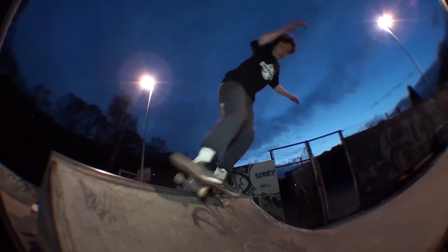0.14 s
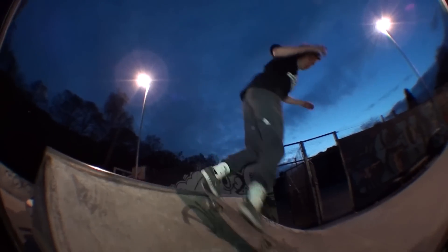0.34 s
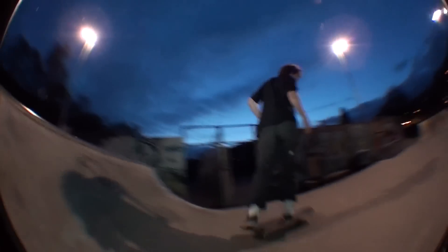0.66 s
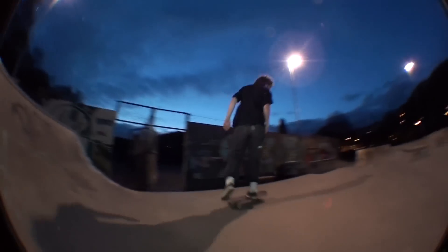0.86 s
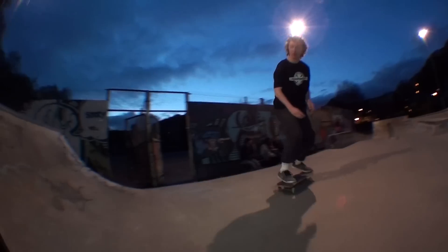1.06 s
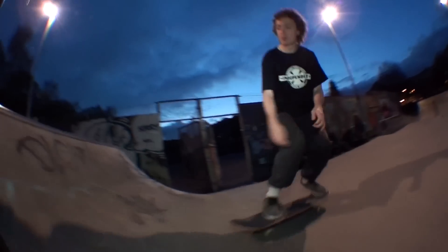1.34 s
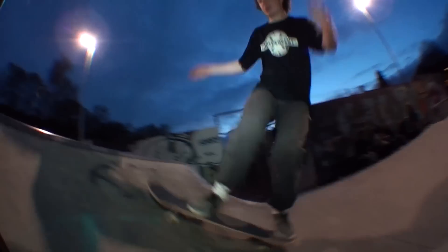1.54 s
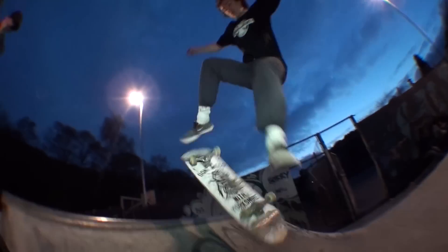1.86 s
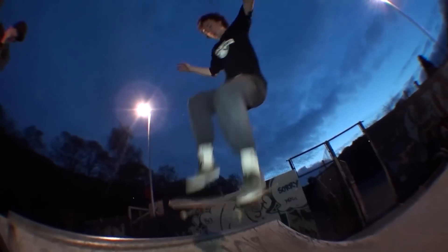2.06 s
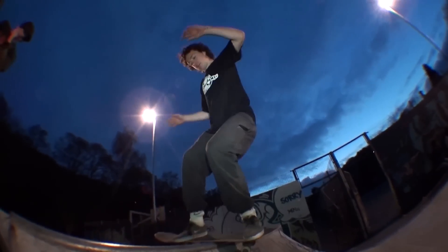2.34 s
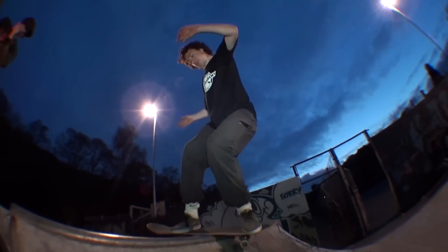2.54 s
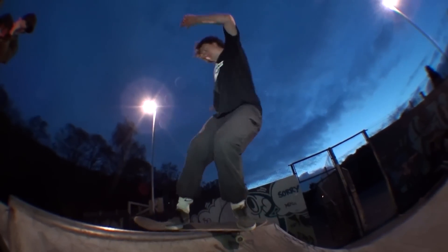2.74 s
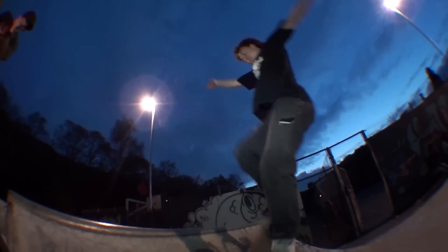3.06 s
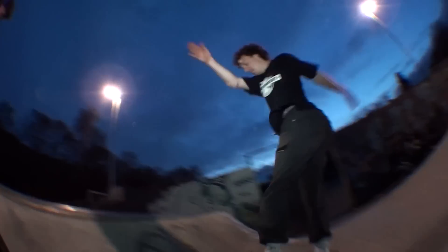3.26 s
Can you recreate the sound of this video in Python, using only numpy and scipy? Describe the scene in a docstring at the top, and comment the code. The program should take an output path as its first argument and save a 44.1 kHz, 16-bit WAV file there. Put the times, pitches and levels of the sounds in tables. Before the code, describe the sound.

Close skateboard on rough outdoor concrete: brief wheel squeals, sharp landing knocks, a steady grinding roll, a pop and rattling flip, dense clatter, a quiet stall, then scraping knocks and rolling; left-leaning, peaks squashed.

```python
"""A concrete skatepark, close to the ramp lip: a board drops off it with a wheel squeal, rolls across,
is flipped, clatters down onto the lip, stalls, then knocks and scrapes back in. Rolling and contacts are
noise through deck and truck resonances, squeals are stick-slip harmonics, tones are gliding noise bands.
Wind and far hiss lie behind. The near camera microphone is louder on its left; a look-ahead limiter
holds the peaks."""
import sys
import numpy as np
from scipy import signal
from scipy.fft import rfft, irfft, next_fast_len
from scipy.io import wavfile
from scipy.ndimage import uniform_filter1d, minimum_filter1d, map_coordinates

SR = 44100
rng = np.random.default_rng(int(sys.argv[2]) if len(sys.argv) > 2 else 0)


def store_wav(level_fs):
    """Save 16-bit WAV to argv[1]."""
    pcm = np.round(np.clip(np.atleast_2d(level_fs), -1, 1) * 32767)
    wavfile.write(sys.argv[1], SR, pcm.T.astype(np.int16))


def voltage_ratio(decibels):
    """Convert decibels (scalar or array-like) to amplitude ratios, 20 dB per decade."""
    exponent = np.asarray(decibels, float) / 20
    return 10 ** exponent


N = 149940  # samples

# axle and wheel resonances: centre_hz, width_hz, peak_db
TRUCK_MODES = [(1016, 23, 5), (1710, 26, 0.5), (2810, 180, 2.5), (3940, 150, 1.5), (6720, 340, 3)]
# plywood resonances: centre_hz, width_hz, peak_db
DECK_MODES = [(183, 110, 0), (517, 62, 3.5)]
RISE_S, STRIKE_DECAY_S = 0.00051, 0.0011  # onset and time constant of hard contacts
DECK_KNOTS_PER_S = 70  # waver of the deck's tones


def unit(x):
    """Scale to rms 1."""
    return x / np.sqrt(np.mean(x ** 2) + 1e-20)


def along(points, hz):
    """Interpolate (Hz, value) points on a log frequency axis."""
    f, v = np.transpose(points)
    return np.interp(np.log(hz + 1), np.log(f + 1), v)


def curves(rows):
    """One value per sample for each column after the time."""
    s, *cols = np.transpose(rows)
    return [np.interp(np.arange(N) / SR, s, c) for c in cols]


def wobble(rate):
    """A smooth random curve, rate knots a second."""
    knots = rng.standard_normal(int(N * rate / SR) + 4)
    return map_coordinates(knots, [np.arange(N) * rate / SR])


def filtered(x, response):
    """Shape the spectrum of x by a response of frequency."""
    n = x.shape[-1]
    m = next_fast_len(n + 4096)
    return irfft(rfft(x, m) * response(np.fft.rfftfreq(m, 1 / SR)), m)[..., :n]


def body(spectrum, modes):
    """A broad colour with resonant peaks on it."""
    def response(hz):
        peaks_db = sum(db / (1 + (2 * (hz - c) / w) ** 2) for c, w, db in modes)
        return voltage_ratio(along(spectrum, hz) + peaks_db)
    return response


def narrow(rows, knots_per_s, steady=0):
    """A gliding, wavering band of noise, silent outside its rows; more knots widen it."""
    hz, db = curves(rows)
    t = np.arange(N) / SR
    phase = 2 * np.pi * np.cumsum(hz) / SR
    in_phase = (steady + wobble(knots_per_s)) * np.sin(phase)
    band = unit(in_phase + wobble(knots_per_s) * np.cos(phase))
    return voltage_ratio(db) * band * (t > rows[0][0]) * (t < rows[-1][0])


def gritty(patchy_db):
    """Stones of scattered size tick under a patchy rubbing noise."""
    grit_per_s, grit_spread_db, grit_share = 1500, 5, 0.23  # share of the power
    z = signal.stft(rng.standard_normal(N), nperseg=512)[2]
    field = uniform_filter1d(rng.standard_normal(z.shape), size=2, axis=0)
    field = uniform_filter1d(field, size=6, axis=1)
    s = np.arange(z.shape[1]) * 256 / SR
    # free wheels rattle in deeper patches during the flip
    depth_db = patchy_db + 1.3 * (s > 1.72) * (s < 2.15)
    rub = signal.istft(z * voltage_ratio(depth_db * unit(field)), nperseg=512)[1][:N]
    hits = rng.random(N) < grit_per_s / SR
    ticks = hits * voltage_ratio(grit_spread_db * rng.random(N)) * rng.standard_normal(N)
    return np.sqrt(1 - grit_share) * unit(rub) + np.sqrt(grit_share) * unit(ticks)


def roll():
    """Rough concrete shakes deck, wheels and bearings; bumps are felt by all."""
    # board on concrete, before bumps: start_s, rumble_db, rasp_db, bearing_db, hiss_db
    rolling = [(0, -52, -41, -46, -53), (.17, -49.5, -41, -41.5, -44), (.27, -50, -35.5, -44, -43.5),
               (.4, -40.5, -36.5, -35.5, -38), (.6, -33, -35, -35, -35), (.72, -32, -35.5, -37, -37),
               (.93, -34.5, -42, -38.5, -38.5), (1.055, -38, -44, -40, -40), (1.07, -41, -32.5, -39, -37.5),
               (1.13, -44.5, -35.5, -38, -38), (1.17, -35, -34.5, -34.5, -38),
               (1.68, -34.5, -35.5, -32.5, -33), (1.71, -47.5, -40, -34, -38),
               (1.8, -43.5, -34, -33, -32.5), (2.02, -49, -36.5, -35, -44.5),
               (2.13, -49.5, -35, -32, -50.5), (2.16, -45, -49, -39, -45), (2.38, -55, -49, -52, -54),
               (2.8, -58.5, -59, -64, -59), (3.1, -46, -38.5, -41.5, -49),
               (3.25, -56.5, -37.5, -37.5, -41.5), (3.3, -42, -49, -31.5, -44.5),
               (3.4, -37, -36, -37.5, -38)]
    # deck rumble colour: hz, level_db_per_hz
    rumble_colour = [(59, -51), (100, -16), (160, -3.5), (400, 1.5), (759, -1.5), (1100, -16), (1430, -32),
                     (2420, -120)]
    # wheel rasp colour: hz, level_db_per_hz
    rasp_colour = [(470, -46), (820, -6), (1610, 1), (2400, -6), (3120, -34), (5280, -120)]
    # bearing rasp colour: hz, level_db_per_hz
    bearing_colour = [(1290, -60), (2200, -0.5), (3880, 3), (4800, -16), (6240, -45), (10600, -120)]
    # grit hiss colour: hz, level_db_per_hz
    hiss_colour = [(2530, -41), (4300, -4), (7620, -8.5), (8430, -13.5), (9470, -26.5), (11400, -24.5),
                   (16200, -42.5)]
    rumble_db, rasp_db, bearing_db, hiss_db = curves(rolling)
    bumps_db = 0.73 * wobble(30.31) + 1.1 * wobble(120)
    # the wheels hop briefly off the concrete
    hop_s, hop_length_s, hop_db = .494, .017, -9
    hopping = abs(np.arange(N) / SR - hop_s - hop_length_s / 2) < hop_length_s / 2
    bumps_db = bumps_db + hop_db * hopping

    def layer(db, colour, modes):
        return voltage_ratio(db + bumps_db) * unit(filtered(gritty(2.8), body(colour, modes)))

    return (layer(rumble_db, rumble_colour, DECK_MODES)
            + layer(rasp_db, rasp_colour, TRUCK_MODES)
            + layer(bearing_db, bearing_colour, TRUCK_MODES)
            + layer(hiss_db, hiss_colour, TRUCK_MODES))


def wind():
    """Wind on the microphone: low noise that slowly swells and sinks."""
    # wind before its swells: start_s, level_db
    wind_levels = [(0, -54), (1.05, -55.5), (1.1, -66), (3.4, -66.5)]
    # wind colour: hz, level_db_per_hz
    gust_colour = [(12, -49), (38, -11), (91, -8), (115, -1), (150, -18), (250, -120)]
    wind_db, = curves(wind_levels)
    noise = unit(filtered(rng.standard_normal(N), body(gust_colour, [])))
    return voltage_ratio(wind_db + 1.6 * wobble(7.8)) * noise


def park_hiss():
    """Steady coloured noise of the far town and park."""
    # far hiss colour: hz, level_db_per_hz
    park_colour = [(150, -17), (550, 2), (1050, -4.5), (1500, 0), (2500, 0.5), (3150, -10.5), (3800, -2.5),
                   (5200, -24.5), (7000, -16), (10000, -27.5), (16000, -38)]
    return voltage_ratio(-47) * unit(filtered(rng.standard_normal(N), body(park_colour, [])))


def contact_body():
    """Response of deck and trucks to a contact."""
    # contact colour: hz, level_db_per_hz
    contact_colour = [(88, -40), (300, -6), (842, -4.5), (1670, 1.5), (2110, -2), (4120, -1), (5420, -6),
                      (6460, -1), (8300, -6.5), (9500, -18.5), (16200, -38)]
    return body(contact_colour, DECK_MODES + TRUCK_MODES)


def contact_rise(t):
    """Fast smooth onset of a contact."""
    return 1 - np.exp(-(t / RISE_S) ** 2)


def without_lows(x):
    """Take out a contact's lows, below 230 Hz."""
    return signal.sosfilt(signal.butter(4, 230, 'high', fs=SR, output='sos'), x)


def knocks():
    """Tail, trucks and wheels: a crack, rough noise while contact holds, then a decay through the board."""
    # knocks and scrapes: start_s, level_db, hold_s, t60_s, brightness_db_per_octave
    contacts = [(.0016, -30, 0.00081, .008, 3), (.0072, -32.5, 0.00087, .015, -2),
                (0.028, -34, 0.0011, 0.019, 0), (.0493, -30, 0.011, 0.027, 1),
                (0.112, -35.5, 0.0069, 0.03, 0.5), (0.4045, -31, 0.002, 0.02, 3),
                (0.4632, -19, 0.0058, 0.05, 0), (2.158, -25, 0.008, 0.19, -1), (2.1865, -26, .008, .03, 1),
                (2.199, -28, 0.013, 0.024, 1.5), (2.229, -23, 0.008, 0.02, 0),
                (2.25, -25, 0.0095, 0.012, 2), (2.2715, -25, 0.0033, .05, 2),
                (2.29, -29.5, 0.00067, 0.044, -3), (2.306, -31.5, 0.004, 0.055, -1),
                (2.323, -40, 0.009, 0.087, -3), (2.36, -43.5, 0.0022, 0.018, 12),
                (2.8252, -24.5, 0.0059, 0.1, -1), (2.928, -33, 0.0072, 0.012, 5.5),
                (2.9702, -27.5, 0.0066, 0.22, -1), (2.999, -34, 0.0035, 0.23, -1),
                (3.112, -24, 0.044, 0.037, -2), (3.142, -28.5, 0.088, 0.033, 1),
                (3.219, -30, 0.0089, 0.036, -1), (3.2653, -25, 0.0075, 0.036, -0.5),
                (3.286, -27, 0.01, 0.035, -0.5), (3.307, -25, 0.013, 0.033, 0.5),
                (3.321, -23, 0.0052, 0.019, -2.5), ]
    crack = 1.25  # extra size of the first crack
    out, t = np.zeros(N + SR), np.arange(SR // 2) / SR
    board, rub = contact_body(), gritty(2.5)
    for s, db, hold, t60, tilt_db in contacts:
        def tilted(hz):
            return board(hz) * voltage_ratio(tilt_db * np.log2(hz / 2500 + 0.0092))
        piece = np.roll(rub, rng.integers(N))[:len(t)]
        noise = unit(filtered(piece, tilted))
        # roughness: a new random level every 90 samples
        rough = voltage_ratio(4.2 * np.repeat(rng.standard_normal(len(t) // 90 + 1), 90)[:len(t)])
        decay = voltage_ratio(-60 * np.maximum(t - hold, 0) / t60)
        first_crack = 1 + crack * np.exp(-t / STRIKE_DECAY_S)
        shape = decay * rough * contact_rise(t) * first_crack
        out[round(s * SR):][:len(t)] += voltage_ratio(db) * shape * noise
    return without_lows(out[:N])


def squeals():
    """Urethane squeals on the lip: stick-slip harmonics at a gliding, jittering rate, coloured by the wheel."""
    # squeals: start_s, length_s, start_slip_hz, end_slip_hz, level_db (before flutter)
    slips = [(0.052, 0.019, 2390, 2320, -29.5), (.068, 0.0088, 2570, 2770, -33),
             (0.178, 0.0066, 3200, 3590, -26), (0.183, 0.014, 5000, 7300, -29),
             (0.201, 0.0092, 7200, 6400, -29), (0.21, 0.016, 6000, 5150, -31.5),
             (.218, 0.016, 5000, 4440, -34), (0.233, 0.014, 1700, 1555, -27.5),
             (0.2483, 0.014, 1367, 1355, -30), (0.297, 0.0135, 1390, 1340, -35)]
    # wheel colour: hz, level_db
    wheel_colour = [(1400, -19), (2400, 6), (4300, -7), (5500, 4), (6900, 10.5), (8200, -2.5), (10000, -22),
                    (14000, -28), (17000, -60)]
    out = np.zeros(N)
    jitter = 1 + .01 * wobble(600)
    flutter = voltage_ratio(3 * wobble(343))
    k = np.arange(1, 11)[:, None]  # harmonic numbers
    for s, length, start_hz, end_hz, db in slips:
        i, n = round(s * SR), round(length * SR)
        hz = np.linspace(start_hz, end_hz, n) * jitter[i:i + n]
        phase = 2 * np.pi * np.cumsum(hz) / SR
        stack = (voltage_ratio(along(wheel_colour, k * hz)) * np.sin(k * phase + k ** 2)).sum(axis=0)
        out[i:i + n] += voltage_ratio(db) * unit(stack) * signal.windows.tukey(n, .3) * flutter[i:i + n]
    return out


def strikes():
    """Hard strikes: very short noise bursts through the board, far over the limiter's ceiling."""
    # hard strikes: start_s
    strike_times = [0.288, .443, 0.4645, 0.4922, 0.5124, 0.5456, 1.796, 2.1575, 2.218, 2.2413, 3.113,
                    3.2667]
    out, t = np.zeros(N + SR), np.arange(SR // 2) / SR
    board = contact_body()
    shape = contact_rise(t) * np.exp(-t / STRIKE_DECAY_S)
    for s in strike_times:
        noise = unit(filtered(rng.standard_normal(len(t)), board))
        out[round(s * SR):][:len(t)] += voltage_ratio(-4) * shape * noise
    return without_lows(out[:N])


def deck_flex():
    """The top deck mode glides as the deck bends with load."""
    # top deck mode: start_s, pitch_hz, level_db
    flex_glide = [(.43, 751.5, -41.5), (.7, 694.5, -39), (1.08, 700, -50), (1.58, 769, -36),
                  (1.75, 752, -44)]
    return narrow(flex_glide, DECK_KNOTS_PER_S)


def bearing_whine():
    """Loaded bearings whine in the turn, a wide wavering band."""
    # bearing whine: start_s, pitch_hz, level_db
    whine_glide = [(.62, 3640, -50), (.72, 3690, -36), (.9, 3390, -33), (.93, 3380, -55)]
    return narrow(whine_glide, 740)


def wheel_hum():
    """Wheels drum at a falling pitch, with a partly steady tone."""
    # wheel drumming: start_s, pitch_hz, level_db
    hum_glide = [(1.1, 198.7, -74), (1.16, 170, -47), (1.43, 140.3, -46)]
    return narrow(hum_glide, 25, steady=0.78)


def foot_thump():
    """A foot settles on the deck: one soft low decaying tone."""
    start_s, pitch_hz, level_db, t60_s = 2.515, 108.6, -42.5, 0.19
    t = np.maximum(np.arange(N) / SR - start_s, 0)
    rise = 1 - np.exp(-t / 0.0064)
    return voltage_ratio(level_db - 60 * t / t60_s) * np.sin(2 * np.pi * pitch_hz * t) * rise


def axle_ring():
    """The axle sings on the lip, a wavering band."""
    # axle singing: start_s, pitch_hz, level_db
    ring_glide = [(3.118, 900, -32.5), (3.155, 1750, -29), (3.195, 1620, -30.5), (3.232, 1750, -28)]
    return narrow(ring_glide, 320)


def lip_slide():
    """The deck's lowest mode and an upper partial rise as it slides over the lip."""
    # lowest deck mode: start_s, pitch_hz, level_db
    slide_glide = [(3.125, 230, -37), (3.18, 396, -50), (3.235, 478, -47)]
    upper_glide = np.multiply(slide_glide, [1, 3.1, 1])  # 3.1 times the pitch
    return narrow(slide_glide, 60) + narrow(upper_glide, 120)


def run_out():
    """The deck's drone rises as the wheels take load."""
    # deck drone: start_s, pitch_hz, level_db
    drone_glide = [(3.265, 240, -40), (3.32, 540, -40), (3.4, 537, -35)]
    return narrow(drone_glide, DECK_KNOTS_PER_S)


def walls(x):
    """Ramps and fences answer with a short decaying noise tail, different on each side."""
    t60_s, unlike = 0.1, 0.69
    t = np.arange(SR // 4) / SR
    common = rng.standard_normal(len(t))
    sides = unlike * rng.standard_normal((2, len(t)))
    tail = (common + sides) * voltage_ratio(-60 * t / t60_s)
    return signal.fftconvolve(x[None], tail / np.linalg.norm(tail[0]), axes=1)[:, :N]


def lean_left(x):
    """Place the sound to the left; the two side gains always add up to 2."""
    # side balance: hz, left_minus_right_db
    balance = [(60, 6), (15000, 9)]

    def sides(hz):
        right = 2 / (1 + voltage_ratio(along(balance, hz)))
        return np.array([2 - right, right])
    return filtered(x, sides)


def scene():
    """All near and to the left, with a weak answer from the walls."""
    x = roll() + wind() + park_hiss() + knocks() + squeals() + strikes()
    x = x + deck_flex() + bearing_whine() + wheel_hum() + foot_thump()
    x = x + axle_ring() + lip_slide() + run_out()
    return lean_left(x + voltage_ratio(-16.5) * walls(x))


def roll_off(x):
    """The treble ends steeply here."""
    return signal.sosfilt(signal.butter(12, 16390, fs=SR, output="sos"), x)


def record(dry):
    """Look-ahead limiter: one gain for both sides falls ahead of each peak and holds after it."""
    ceiling_db, ahead_s, hold_s = -14, .004, .001
    ahead, hold = round(ahead_s * SR), round(hold_s * SR)
    need = np.minimum(1, voltage_ratio(ceiling_db) / (np.abs(dry).max(axis=0) + 1e-9))
    low = minimum_filter1d(need, ahead + hold, origin=(hold - ahead) // 2)
    gain = uniform_filter1d(low, ahead // 2, origin=ahead // 4 - 1)
    return roll_off(dry * gain)


dry = scene()
out = record(dry)
store_wav(out)
```